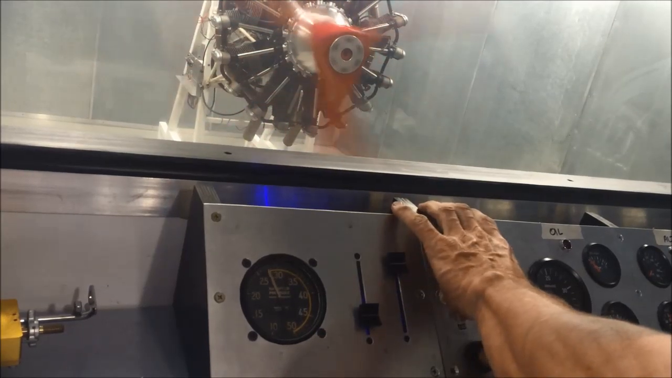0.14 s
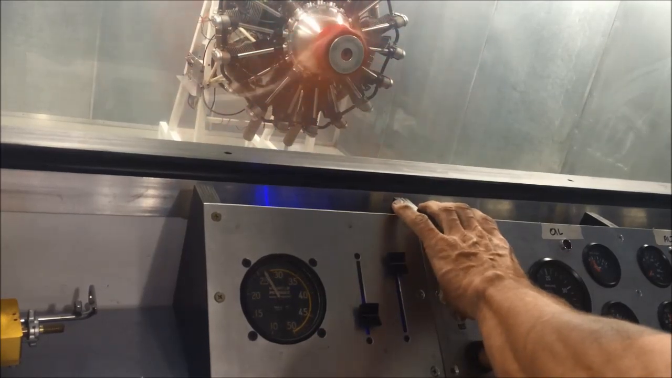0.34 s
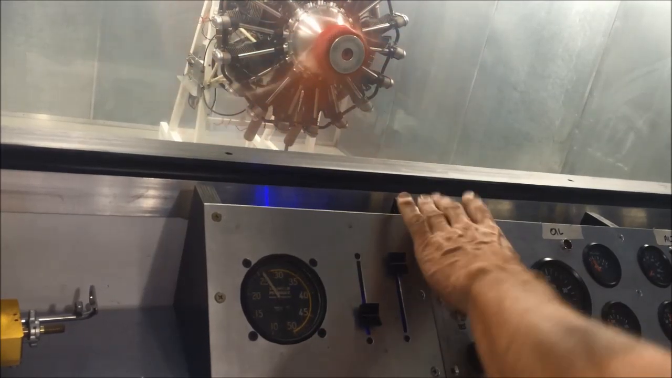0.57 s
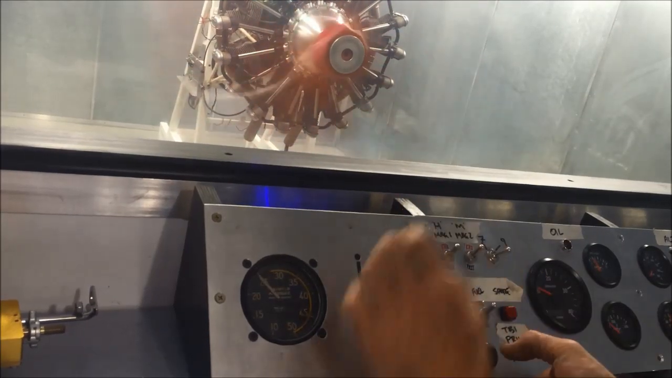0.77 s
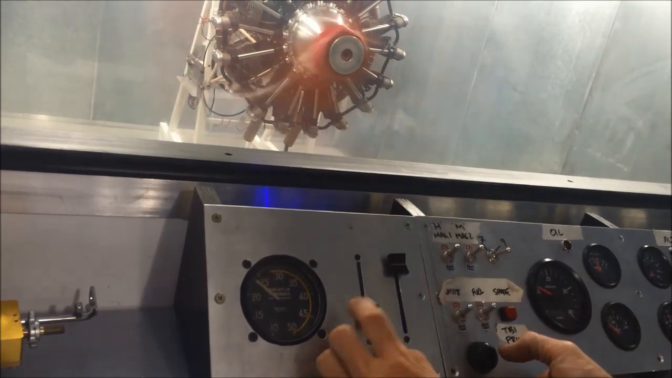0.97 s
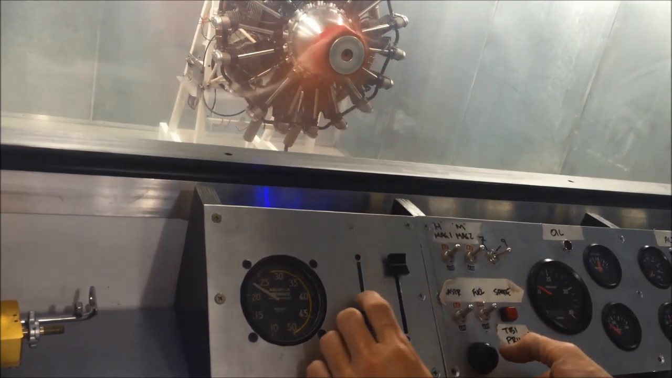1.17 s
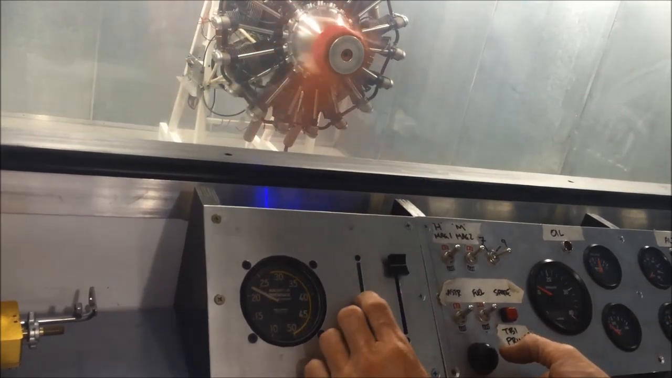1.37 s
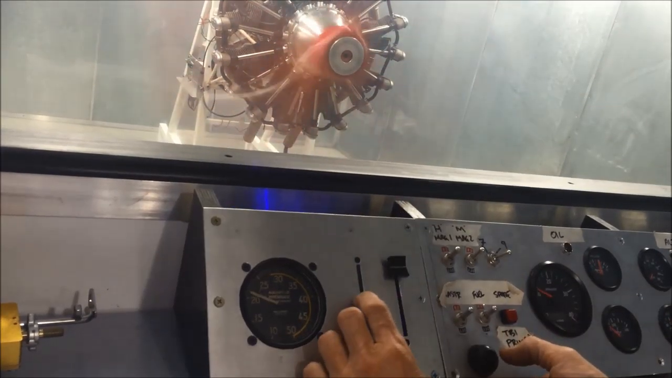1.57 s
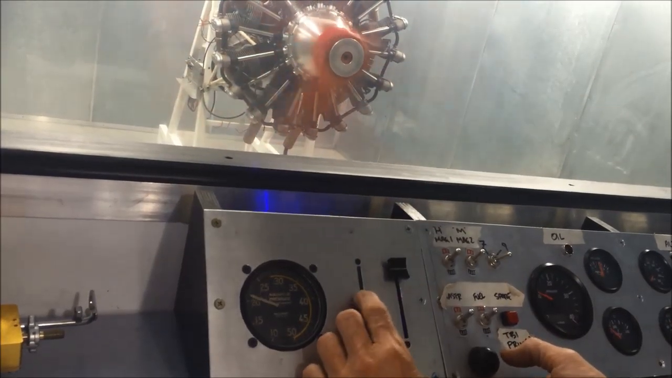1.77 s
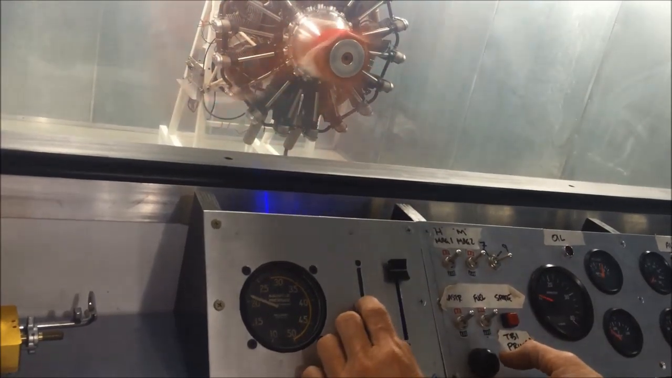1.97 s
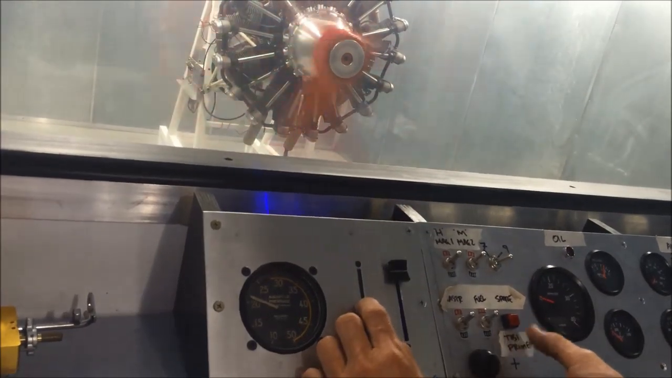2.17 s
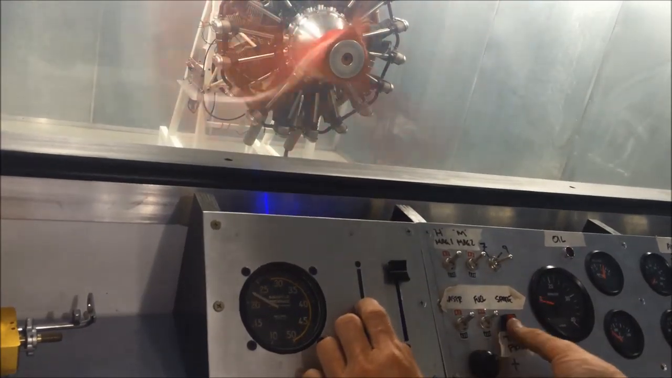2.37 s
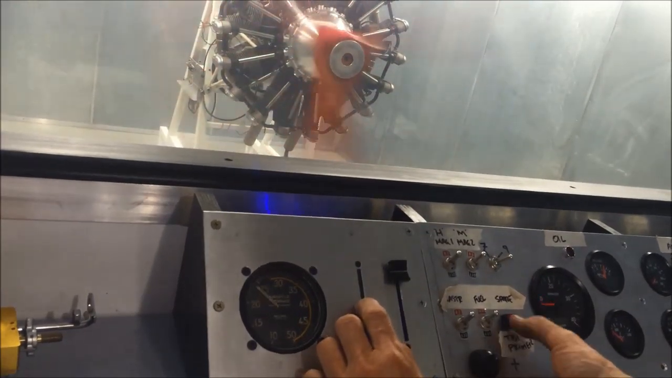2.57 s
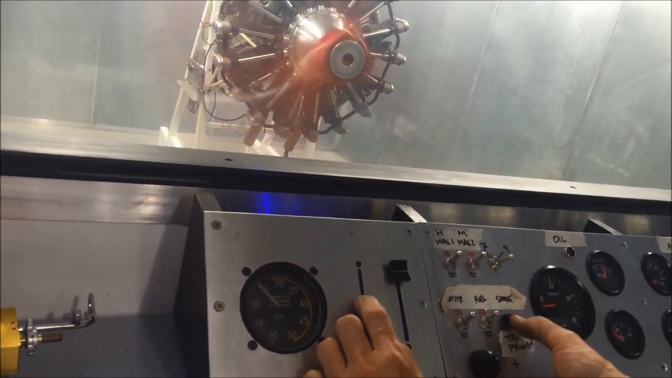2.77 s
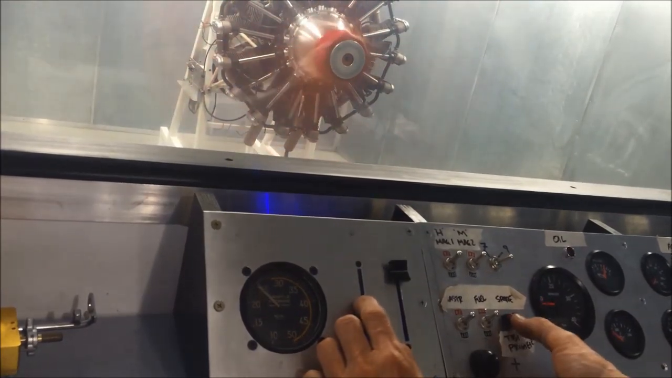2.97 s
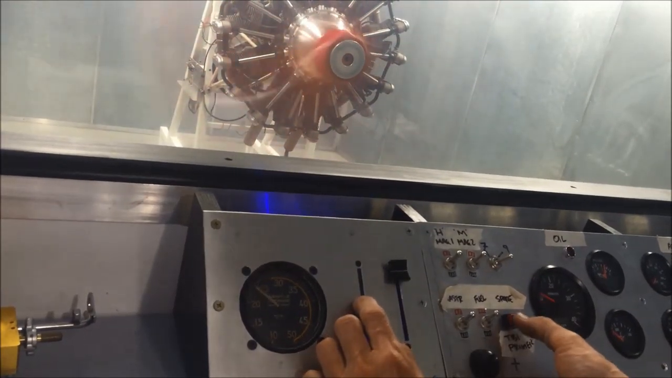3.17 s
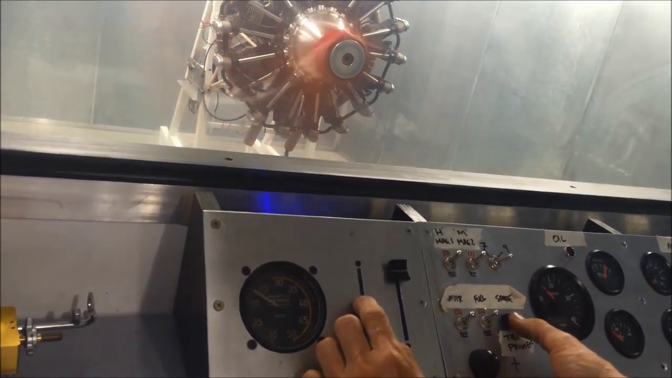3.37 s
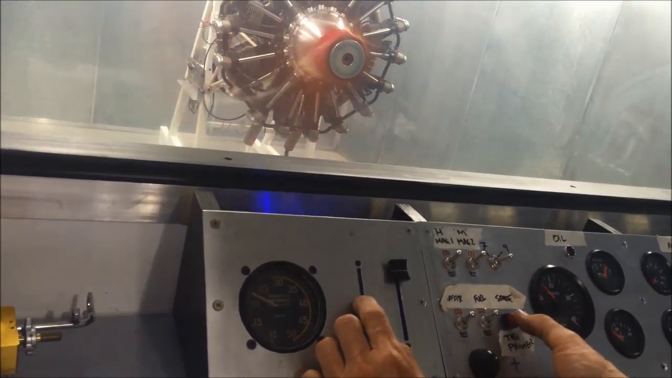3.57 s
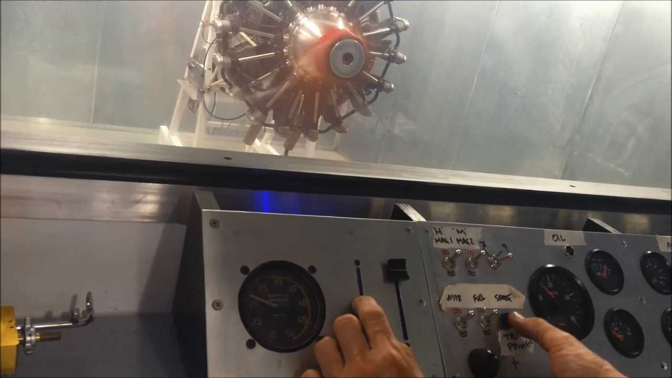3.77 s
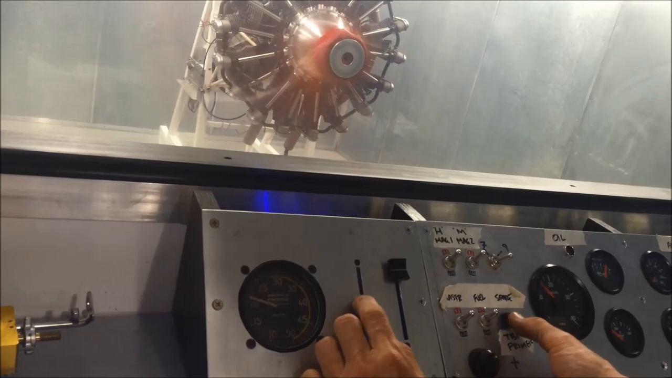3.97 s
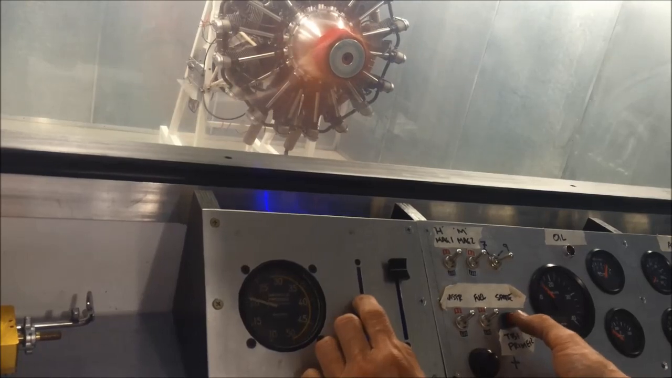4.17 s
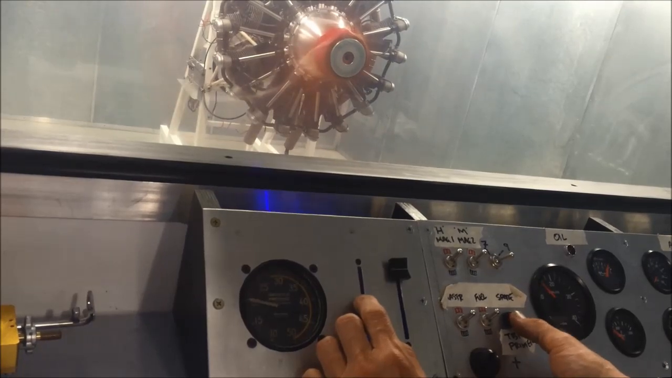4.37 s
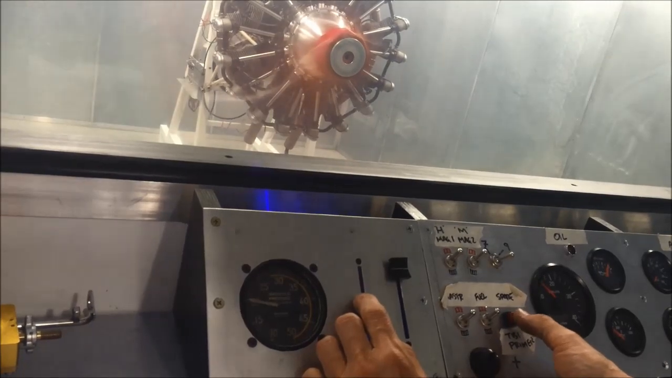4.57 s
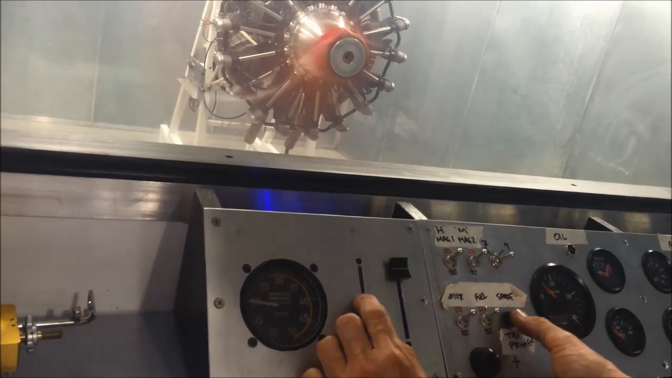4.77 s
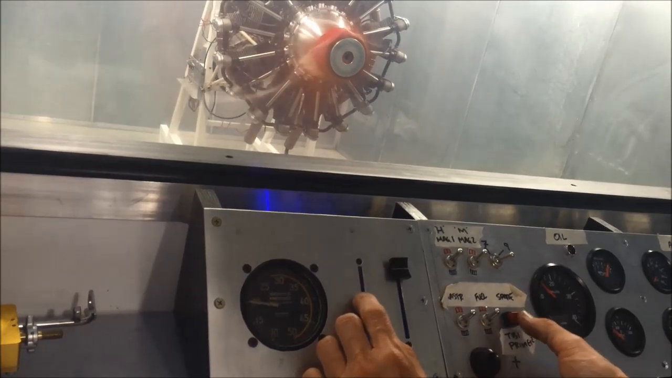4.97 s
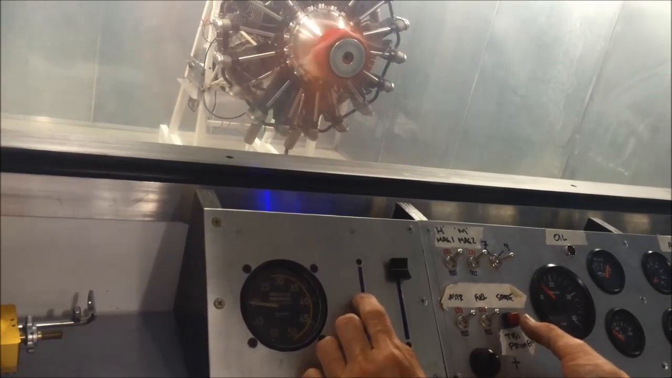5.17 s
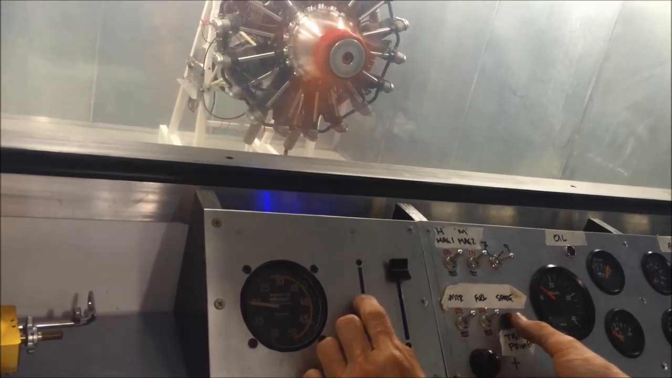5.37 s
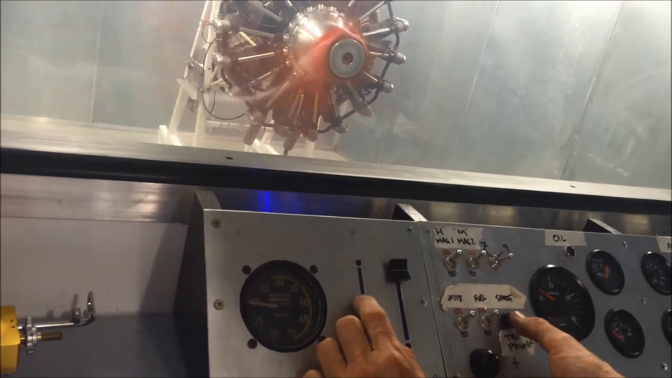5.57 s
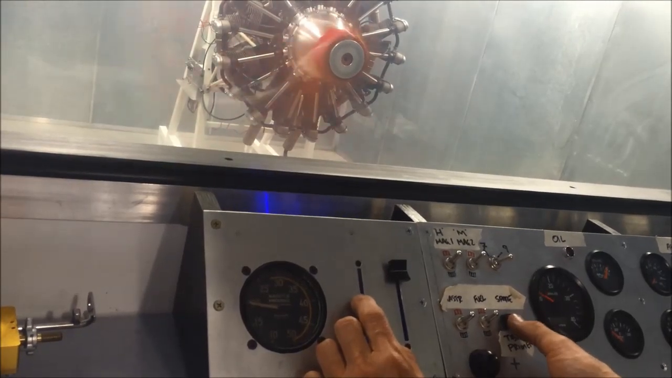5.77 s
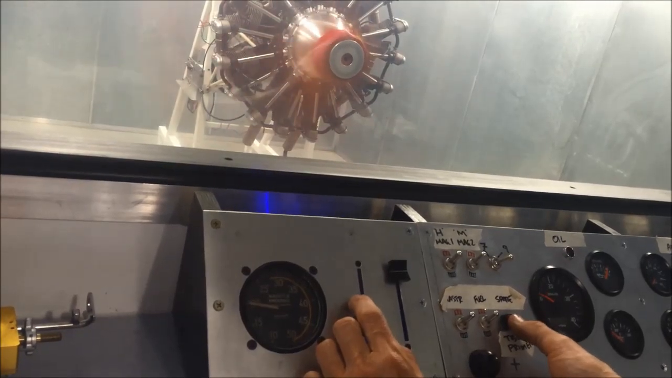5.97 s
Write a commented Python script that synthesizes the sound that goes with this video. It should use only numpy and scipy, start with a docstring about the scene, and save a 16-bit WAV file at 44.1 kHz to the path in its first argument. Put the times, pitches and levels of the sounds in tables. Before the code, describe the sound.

Heard through the window of an engine test room, a big piston aircraft engine sputters to life with deep thumps and puffs of compressed air. It slows and stumbles, gets another whistling burst of air, then speeds up and eases to a rough, throbbing idle. Valve clatter and a light hiss run underneath the booming exhaust, and a loose metal panel sings in fits.

```python
"""A nine-cylinder radial engine catches in a test cell, heard from the control booth behind a window.
It fires unevenly, sags, gets a second shot of starting air, picks up and settles to a lumpy idle.
Exhaust pulses bark from the stubs and set the cell booming; tappets clatter in step with the crank.
Starting air whistles and spurts over the hiss of the ports, and shaken sheet metal sings."""
import sys
import numpy as np
from scipy import signal
from scipy.fft import rfft, irfft, next_fast_len
from scipy.io import wavfile
from scipy.ndimage import uniform_filter1d

SR = 44100
rng = np.random.default_rng(int(sys.argv[2]) if len(sys.argv) > 2 else 0)


def wav_record(signal):
    """Record a signal, one row per channel, as 16-bit PCM in the file named by sys.argv[1]."""
    frames = np.transpose(np.atleast_2d(signal))
    bounded = np.clip(frames, -1, 1)
    # unit amplitude maps onto the largest positive 16-bit level
    quanta = np.round(bounded * 32767).astype(np.int16)
    wavfile.write(sys.argv[1], SR, quanta)


N = 265923
TIME = np.arange(N) / SR

# the crank catching, sagging and picking up: (time [s], speed [turns/s])
CRANK_SPEED = [(0, 13.7), (.3, 22.8), (.55, 23.6), (.78, 19.5), (1.12, 20.3), (1.35, 19), (1.62, 16),
               (2.15, 16.2), (2.75, 15.8), (3, 23), (3.15, 28.5), (3.35, 29.2), (3.6, 24), (4.2, 25.8),
               (4.55, 23), (4.9, 23.6), (5.55, 22), (6.03, 23.2)]
# how hard the engine works: (time [s], exhaust rasp [dB], valve clatter [dB])
WORKLOAD = [(0, -49.5, -44.5), (.07, -42.5, -41), (.17, -48.5, -43.5), (.24, -42.5, -38), (.5, -34, -34),
            (.74, -41.5, -45), (1.07, -37, -38.5), (1.85, -46.5, -44.5), (2.3, -47, -42),
            (2.9, -41.5, -34.5), (3.05, -33.5, -36), (3.35, -30.5, -37), (3.45, -34.5, -34),
            (3.88, -35.5, -37), (4.28, -34, -34.5), (4.5, -37.5, -37), (5.4, -38, -37.5), (5.6, -44, -39),
            (6.03, -37.5, -36.5)]
# how evenly it turns: (time [s], firing note against the drone [dB], hum against the firings [dB])
EVENNESS = [(0, -20, -22.5), (.65, -13.5, -23.5), (.85, 13, -37), (1.1, 1, -39), (1.4, -3, -25),
            (1.62, 5, -14), (2.12, 6, -16.5), (2.3, -7, -28), (2.78, -6, -34), (2.95, -18, -17),
            (3.15, -2, -14), (3.38, 2, -12.5), (3.6, -13, -25), (4.5, -8.5, -26), (6.03, -14, -25)]
# cylinders in firing order: (strength [dB], travel time from the exhaust stub [s])
CYLINDERS = [(3.5, 0.00023), (-2, .0052), (1.5, .0068), (-0.5, .0021), (1, .0008), (2, .0061), (1.5, .0034),
             (2, 0.00033), (-3, .0047)]
# the cell's reverb tail: (frequency [Hz], time to fall 60 dB [s])
CELL_T60 = [(100, 0.75), (500, 0.5), (2000, 0.37), (6000, 0.24), (15000, 0.22)]
# engine hum, the firing rate (4.5) and partials above it: (multiple of crank speed [x], level [dB])
HUM_PARTIALS = [(4.5, 0.5), (5.5, 4), (6, -2), (8, 3), (9, -2), (10, -4.5)]
# exhaust stub resonances: (frequency [Hz], width [Hz], gain [dB])
BARK_MODES = [(120, 14, -16), (130.7, 17, 6), (155.6, 8.2, -0.5), (192, 16.6, -2.5), (226, 12.3, -7),
              (258, 19, -19)]
# colour of the escaping gas: (frequency [Hz], gain [dB])
RASP_EQ = [(230, -23), (290, -13), (320, 2), (348, 4), (385, -6.5), (425, 0), (480, -6), (545, 2),
           (600, -1), (660, 3.5), (755, -1.5), (840, -11), (1000, -8), (1300, -11)]
# colour of the valve gear: (frequency [Hz], gain [dB])
CLATTER_EQ = [(700, -5.5), (950, -1.5), (1210, 0), (1320, -3), (1450, -3), (1630, -1), (1900, -5),
              (2170, -2), (2500, -3.5), (3000, -4), (3700, -6), (4500, -11.5), (6500, -15)]
# ring of cylinder heads and rocker covers: (frequency [Hz], width [Hz], gain [dB])
HEAD_MODES = [(1240, 27, -10.5), (1593, 39, -3), (1694, 37, -5.5), (2184, 88, -8)]
# colours of the port hiss and the thin steady hiss above it: (frequency [Hz], gain [dB])
PORT_HISS_EQ = [(2500, -2), (4200, -3.5), (5100, -3), (5800, 0.5), (6500, 0), (7200, -2), (8000, -3),
                (10000, -3.5), (11700, -4.5), (13000, 0.5), (15300, -14)]
STEADY_HISS_EQ = [(5000, -4), (9000, -24), (11800, 0), (13300, -11), (14200, 5), (14600, 1), (15300, -1)]
# two shots of starting air, a whistle curve each: (time [s], pitch [Hz], relative level [dB])
AIR_SHOTS = [
    [(0, 9300, -67), (.06, 9400, -54), (.09, 10400, -47), (.19, 10700, -47), (.22, 12100, -40),
     (.29, 12300, -37.5), (.35, 12900, -40), (.45, 13200, -46), (.6, 12900, -52)],
    [(2.05, 13600, -60), (2.24, 13240, -54), (2.33, 12800, -47), (2.48, 12400, -47), (2.6, 11900, -44.5),
     (2.75, 11280, -50), (2.83, 12600, -43), (2.95, 12930, -46), (3.05, 12700, -60)],
]
# air pipe resonances: (frequency [Hz], width [Hz], gain [dB])
PIPE_MODES = [(9100, 130, 5), (12100, 70, -1), (13000, 77, -4), (13123, 50, -1), (13426, 35, 4)]
# the cell's low modes: (frequency [Hz], width [Hz], gain [dB])
BOOM_MODES = [(73, 3.5, 0), (83.5, 6.2, -16.5), (46.8, 23, -23)]
# volleys, several cylinders catching in a row: (start [s], length [s], level [dB])
VOLLEYS = [(.04, 0.026, -25.5), (.195, 0.051, -21), (.305, 0.089, -15), (.385, 0.14, -10.5),
           (.57, 0.077, -16.5), (.72, 0.1, -27), (1.08, 0.36, -22.5), (1.44, 0.26, -13.5), (1.68, .19, -11),
           (1.88, 0.076, -15.5), (1.95, 0.046, -12.5), (2.0, .09, -17), (2.09, 0.088, -13),
           (2.25, .04, -24), (2.35, 0.089, -25), (2.52, 0.043, -21.5), (2.64, 0.082, -26), (2.8, 0.03, -22),
           (2.87, 0.048, -12), (2.905, 0.091, -9.5), (3.555, 0.091, -14), (3.66, 0.22, -18.5),
           (4.11, 0.22, -22.5), (4.34, 0.24, -15.5), (4.62, .19, -15.5), (4.84, 0.059, -13),
           (4.93, 0.3, -21), (5.22, 0.065, -14), (5.36, .08, -14.5), (5.5, 0.064, -16.5), (5.56, .12, -15),
           (5.685, .1, -12), (5.83, .17, -13.5)]
# spurts of starting air: (start [s], level [dB], decay [s])
SPURTS = [(.065, -42, 0.09), (.208, -28, .07), (.32, -29, .07), (.425, -32, 0.07), (2.22, -39.5, .08),
          (2.365, -38, .08), (2.545, -34, 0.079), (2.685, -36, 0.034), (2.8, -33, 0.19), (2.945, -39, .025),
          (3.01, -36.5, 0.097)]
# colour of a spurt: (frequency [Hz], gain [dB])
SPURT_EQ = [(1000, 5), (2500, 2), (4200, -0.5), (6000, -0.5), (9000, -1.5), (13000, -2), (15300, -7)]
# single cylinders firing hard: (time [s], relative peak [dB])
BANGS = [(.07, -21), (.248, -17), (0.368, -6.5), (0.44, -3), (.52, -6), (0.604, -5), (0.644, -7.5),
         (.684, -10), (1.122, -9), (1.191, -8), (1.234, -10), (1.326, -11), (1.373, -8.5), (1.472, -6),
         (1.588, -6), (1.849, -5), (1.974, -12.5), (2.941, -6), (2.997, -5), (3.052, -6.5), (3.109, -10),
         (3.149, -8.5), (3.219, -11), (3.327, -9.5), (3.576, -5.5), (3.631, -8), (3.752, -12), (3.832, -9),
         (3.878, -5.5), (3.917, -10), (3.958, -9.5), (4.129, -7), (4.209, -11), (4.409, -15), (4.465, -6),
         (4.493, -7), (4.563, -2), (4.647, -9), (4.855, -4), (4.895, -4.5), (5.275, -7), (5.428, -7),
         (5.6, -7), (5.71, -4), (5.736, -4), (5.924, -5.5)]
# sheet metal singing as the engine surges: (peak time [s], pitch [Hz], half-length [s], level [dB])
SHEET_NOTES = [(.5, 1600, 0.073, -49), (1.055, 557.4, 0.051, -34.5), (1.143, 341, 0.12, -37),
               (1.252, 1640, 0.45, -45), (3.21, 349.3, 0.15, -31.5), (3.328, 553.8, 0.044, -34),
               (3.361, 698, .05, -37), (4.275, 1205, 0.055, -38), (5.271, 350.2, .13, -41)]
# a loose panel buzzing in fits: (start [s], length [s], level [dB])
PANEL_FITS = [(2.73, 0.14, -43.5), (3.06, 0.11, -38), (3.23, .06, -41), (3.33, .11, -36), (3.5, .36, -46.5),
              (4.0, .2, -43.5), (4.29, 0.1, -41.5), (4.54, .15, -40), (4.94, 0.12, -40.5),
              (5.17, 0.079, -40.5), (5.3, 0.12, -43.5), (5.86, .17, -45)]

IDLE_RASP_DB, IDLE_CLATTER_DB = -39, -38  # the workload at idle
# level at idle, and dB gained per dB of rasp (boom, bark) or of clatter (hiss)
BOOM_DB, BOOM_SLOPE = -25, 0.61
BARK_DB, BARK_SLOPE = -29, 1.07
HISS_DB, HISS_SLOPE = -42, 0.63
BARK_IN_VOLLEY_DB = -14  # how much of a volley's boom is also bark
CATCH_S = 0.36  # fade-in of the cell's steady boom


def gain_of(db):
    """Decibels to amplitude."""
    return 10 ** (np.asarray(db) / 20)


def unit_rms(x):
    """Scales to rms 1."""
    return x / np.sqrt(np.mean(x ** 2) + 1e-20)


def running_power(x, size):
    """Mean square, smoothed twice over size samples."""
    return abs(uniform_filter1d(uniform_filter1d(x ** 2, size), size))


def levelled(x, seconds):
    """Rides the gain to a running rms of 1, keeping the faster throb."""
    return x / np.sqrt(running_power(x, int(seconds * SR)) + 1e-12)


def curves(rows):
    """One automation curve for each column after the time."""
    times, *columns = np.transpose(rows)
    return [np.interp(TIME, times, column) for column in columns]


def fits(rows, attack_s, release_s):
    """Envelope of a sound that comes in fits: each rises, holds and dies away."""
    power = np.zeros(N)
    for start, length, db in rows:
        rise = np.clip((TIME - start) / attack_s, 0, 1)
        fall = np.exp(-np.clip((TIME - start - length) / release_s, 0, 20))
        power += (gain_of(db) * rise * fall) ** 2
    return np.sqrt(power)


def value_at(points, hz):
    """Reads a curve on a log-frequency axis."""
    freqs, values = np.transpose(points)
    return np.interp(np.log(hz + 1), np.log(freqs + 1), values)


def coloured(x, eq):
    """Applies an EQ curve with steep roll-offs beyond its ends, at rms 1."""
    size = next_fast_len(N + 4096, True)
    hz = np.fft.rfftfreq(size, 1 / SR)
    low_cut = 1 / (1 + (eq[0][0] / (hz + 1)) ** 4)
    high_cut = 1 / (1 + (hz / eq[-1][0] / 2) ** 4)
    spectrum = rfft(x, size) * gain_of(value_at(eq, hz)) * low_cut * high_cut
    return unit_rms(irfft(spectrum, size)[:N])


def resonate(x, hz, width_hz):
    """Two passes through a resonance whose pitch may glide."""
    carrier = np.exp(2j * np.pi * np.cumsum(hz * np.ones(N)) / SR)
    pole = np.exp(-np.pi * width_hz / SR)
    for _ in range(2):
        x = 2 * (carrier * signal.lfilter([1 - pole], [1, -pole], x / carrier + 1e-18)).real
    return x


def ring(x, modes, band_hz):
    """A bank of modes, confined to a band."""
    body = sum(gain_of(db) * signal.lfilter(*signal.iirpeak(hz, hz / width, SR), x)
               for hz, width, db in modes)
    return signal.sosfilt(signal.butter(3, band_hz, "band", fs=SR, output="sos"), body)


def strokes(turns, scatter_db, jitter_s):
    """Nine pulses in two crank turns; each cylinder has its own strength and path, and no two hits match."""
    onsets = np.flatnonzero(np.diff(np.floor(turns * len(CYLINDERS) / 2), prepend=-1))
    strength, lag = rng.standard_normal((len(onsets), 2)).T
    db, travel_s = np.resize(CYLINDERS, (len(onsets), 2)).T
    arrivals = onsets + ((travel_s + lag * jitter_s) * SR).astype(int)
    pulses = np.zeros(N)
    pulses[np.clip(arrivals, 0, N - 1)] = gain_of(db + scatter_db * strength)
    return pulses


def puffs(pulses, decay_s, flow):
    """Each pulse lets out a dying burst of noise over a steady flow."""
    gate = unit_rms(signal.lfilter([1], [1, -np.exp(-1 / (decay_s * SR))], pulses))
    return unit_rms((flow + gate) * rng.standard_normal(N))


def cell_reverb(x, wet_db, tail_count=4):
    """Direct sound plus wall echoes; crossfading tails keep them shifting as in churning air."""
    hz, t, noise = signal.stft(rng.standard_normal((tail_count, SR // 2)), SR, nperseg=256)
    decay = gain_of(-60 * t / value_at(CELL_T60, hz)[:, None])
    tails = signal.istft(noise * decay, SR, nperseg=256)[1]
    churn_hz = np.linspace(2.3, 7.9, tail_count)[:, None]
    sends = np.cos(2 * np.pi * (churn_hz * TIME + rng.random((tail_count, 1))))
    sends /= np.sqrt((sends ** 2).sum(0) + .1)
    echoes = signal.fftconvolve(x * sends, tails / np.linalg.norm(tails[0]), axes=1).sum(0)[:N]
    return unit_rms(x + gain_of(wet_db) * echoes)


def exhaust(turns, firings, hum_db, bark_db, rasp_db):
    """Firings and engine hum make the stubs bark, with a rasp of escaping gas on top."""
    hum = sum(gain_of(db) * np.sin(2 * np.pi * (k * turns + rng.random())) for k, db in HUM_PARTIALS)
    drive = unit_rms(firings) + gain_of(hum_db) * unit_rms(hum)
    bark = levelled(ring(drive, BARK_MODES, band_hz=(104, 245)), seconds=0.064)
    gas = 0.61 * unit_rms(firings) + puffs(firings, decay_s=0.0036, flow=0.16)
    rasp = levelled(coloured(cell_reverb(gas, wet_db=4.5), RASP_EQ), seconds=0.1)
    return bark * gain_of(bark_db) + rasp * gain_of(rasp_db + 0.4)


def valve_gear(turns, clatter_db):
    """Tappets click in step with the crank, each trailed by a short rattle that rings the heads."""
    clicks = strokes(turns, scatter_db=2.5, jitter_s=.0002)
    taps = 0.17 * unit_rms(clicks) + puffs(clicks, decay_s=0.0055, flow=0.38)
    rattle = coloured(cell_reverb(taps, wet_db=8.5), CLATTER_EQ)
    clatter = rattle + ring(rattle, HEAD_MODES, band_hz=(400, 6000))
    return levelled(clatter, seconds=0.31) * gain_of(clatter_db + 0.99)


def port_hiss(turns, hiss_db, steady_db=-45):
    """Air streams from the ports, spitting with each stroke, over a thin steady hiss."""
    spit = puffs(strokes(turns, scatter_db=1, jitter_s=0.00052), decay_s=0.0087, flow=6.4)
    steady = gain_of(steady_db) * coloured(rng.standard_normal(N), STEADY_HISS_EQ)
    return coloured(cell_reverb(spit, wet_db=6.5), PORT_HISS_EQ) * gain_of(hiss_db) + steady


def starting_air(shot, width_hz):
    """Air through a narrow valve: a breathy whistle that slides with the pressure and rings the pipe."""
    hz, db = curves(shot)
    jet = resonate(rng.standard_normal(N), hz, width_hz)
    whistle = jet + ring(jet, PIPE_MODES, band_hz=(8000, 15000))
    flutter_db = 1.6 * unit_rms(uniform_filter1d(rng.standard_normal(N), size=900))
    valve_open = (TIME >= shot[0][0]) & (TIME < shot[-1][0])
    return unit_rms(whistle) * gain_of(db + flutter_db + 3.5) * valve_open


def cell_boom(turns, firings, note_db, level, rumble_db=-3):
    """Firings drive the cell's standing wave and rumble, blended with the firing note and hard bangs."""
    standing_wave = levelled(resonate(firings, hz=73.12, width_hz=4.85), seconds=0.046)
    rumble = levelled(ring(firings, BOOM_MODES, band_hz=(39.6, 133)), seconds=0.094)
    drone = levelled(standing_wave + gain_of(rumble_db) * rumble, seconds=0.11)
    firing_note = np.sqrt(2) * np.sin(np.pi * len(CYLINDERS) * turns) * gain_of(note_db)
    bed = (drone + firing_note) / np.hypot(1, gain_of(note_db)) * level
    thumps = bangs(hz=81.7, half_length_s=0.0097, trim_db=-2.5)
    power = level ** 2 + running_power(thumps, size=1100)  # the layers add in power, whatever their phase
    return levelled(bed + thumps, seconds=.035) * np.sqrt(power)


def air_spurts(attack_s=.012):
    """Starting air escapes in sudden puffs."""
    envelope = np.zeros(N)
    for start, db, decay_s in SPURTS:
        rise = np.clip((TIME - start) / attack_s, 0, 1)
        envelope += gain_of(db) * rise * np.exp(-abs(TIME - start) / decay_s)
    return envelope * coloured(rng.standard_normal(N), SPURT_EQ)


def bangs(hz, half_length_s, trim_db):
    """A hard firing shoves the air: a round thump of about two cycles."""
    out = np.zeros(N)
    t = np.arange(-SR // 30, SR // 30) / SR
    thump = -np.cos(2 * np.pi * hz * t) * np.exp(-(t / half_length_s) ** 2)
    for peak_s, db in BANGS:
        start = max(round(peak_s * SR) - len(t) // 2, 0)
        out[start:start + len(t)] += gain_of(db + trim_db) * thump[:N - start]
    return out


def sheet_metal(waver_hz):
    """Each sheet swells and fades on its own wavering note."""
    out = np.zeros(N)
    for peak_s, hz, half_length_s, db in SHEET_NOTES:
        waver = np.interp(TIME, np.linspace(0, TIME[-1], num=400), rng.standard_normal(400))
        note = np.sin(2 * np.pi * np.cumsum(hz + waver_hz * waver) / SR)
        out += note * gain_of(db) * np.exp(-((TIME - peak_s) / half_length_s) ** 2)
    return out


def loose_panel(hz, width_hz):
    """A thin metal panel sings in fits as the engine shakes it."""
    song = levelled(resonate(rng.standard_normal(N), hz, width_hz), seconds=0.038)
    return song * fits(PANEL_FITS, attack_s=0.028, release_s=0.039)


def scene():
    """One crank times the engine layers and its workload rides their faders; air and metal sit on top."""
    turns = np.cumsum(curves(CRANK_SPEED)[0]) / SR
    rasp_db, clatter_db = curves(WORKLOAD)
    note_db, hum_db = curves(EVENNESS)
    effort_db = rasp_db - IDLE_RASP_DB
    steady_boom = gain_of(BOOM_DB + BOOM_SLOPE * effort_db) * np.minimum(TIME / CATCH_S, 1)
    steady_bark = gain_of(BARK_DB + BARK_SLOPE * effort_db)
    volleys = fits(VOLLEYS, attack_s=.025, release_s=0.033)
    bark_db = 20 * np.log10(np.hypot(steady_bark, gain_of(BARK_IN_VOLLEY_DB) * volleys))
    hiss_db = HISS_DB + HISS_SLOPE * (clatter_db - IDLE_CLATTER_DB)
    firings = strokes(turns, scatter_db=2.5, jitter_s=.0013)
    engine = cell_boom(turns, firings, note_db, level=np.hypot(volleys, steady_boom))
    engine += exhaust(turns, firings, hum_db, bark_db, rasp_db)
    engine += valve_gear(turns, clatter_db)
    air = port_hiss(turns, hiss_db)
    air += starting_air(AIR_SHOTS[0], width_hz=5000) + starting_air(AIR_SHOTS[1], width_hz=1050)
    air += air_spurts()
    metal = loose_panel(hz=1011, width_hz=16.3) + sheet_metal(waver_hz=12.2)
    return (engine + air + metal)[None]


def record(dry, cutoff_hz=15350):
    """A steep high cut takes the very top off the mix."""
    high_cut = signal.firwin(801, cutoff_hz, window=("kaiser", 9), fs=SR)
    return signal.oaconvolve(dry, high_cut[None], "same")


dry = scene()
out = record(dry)
wav_record(out)
```